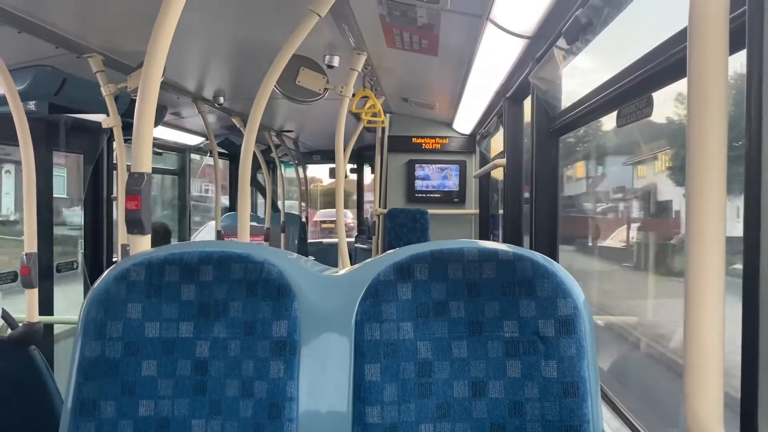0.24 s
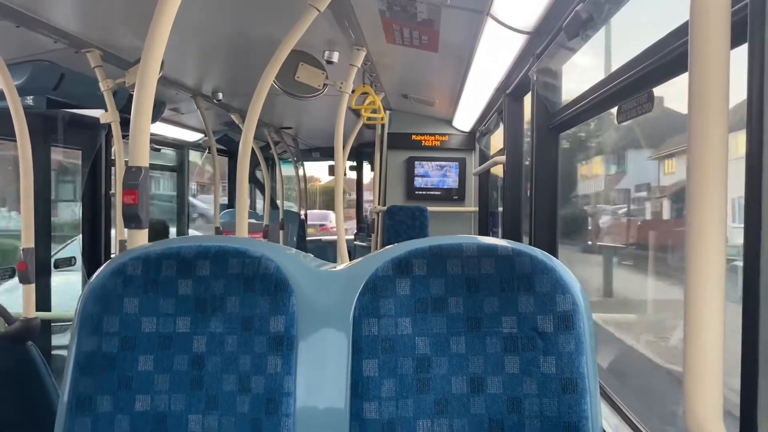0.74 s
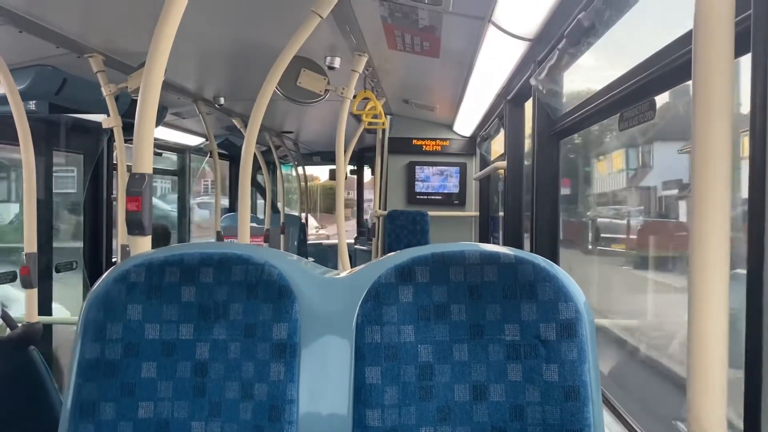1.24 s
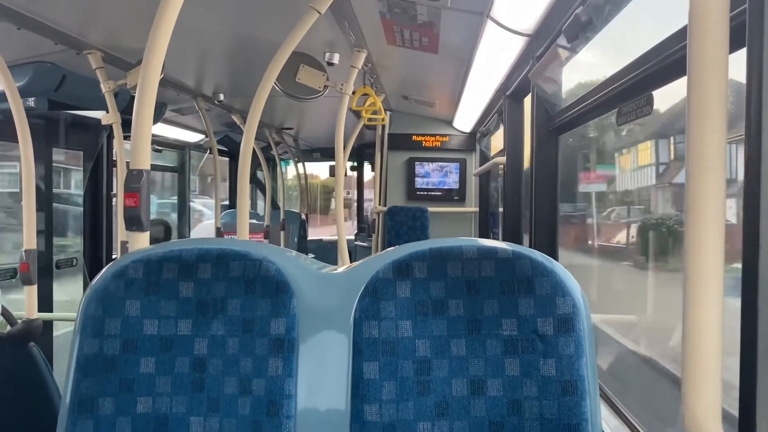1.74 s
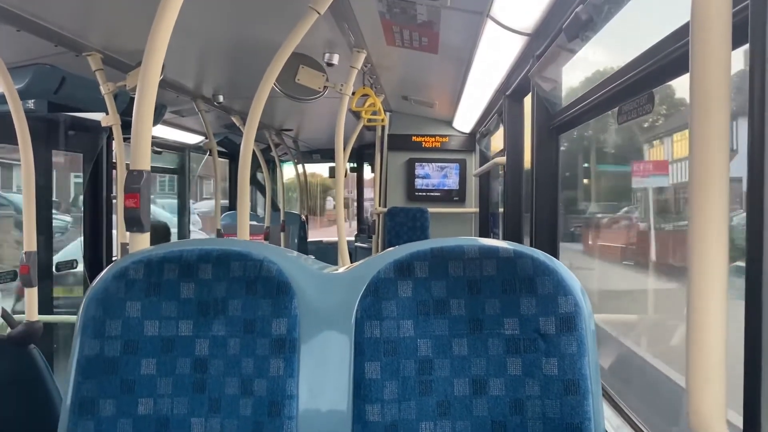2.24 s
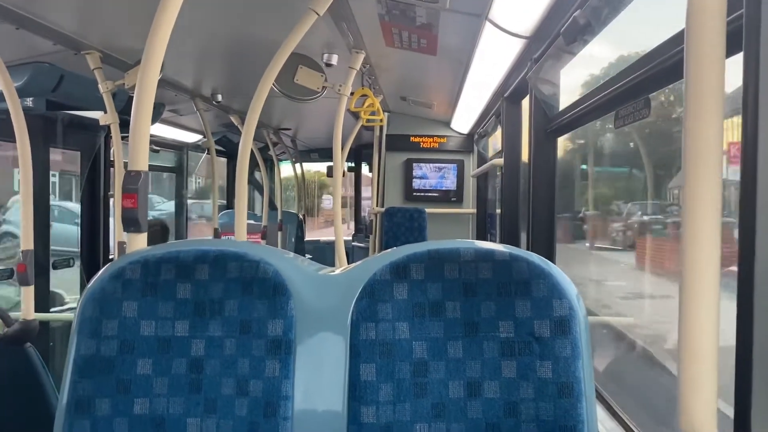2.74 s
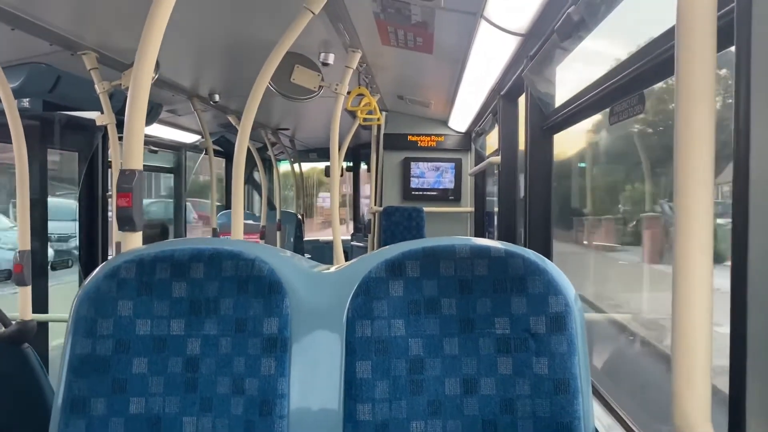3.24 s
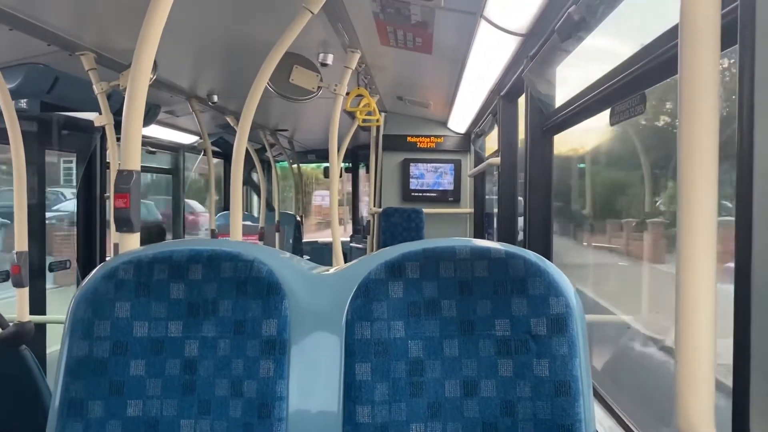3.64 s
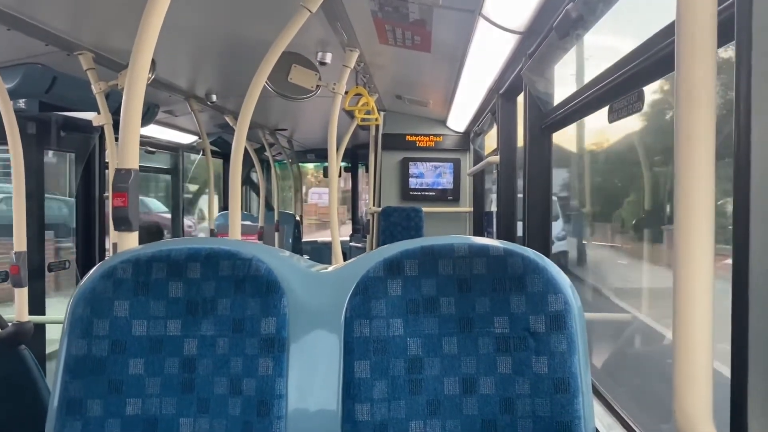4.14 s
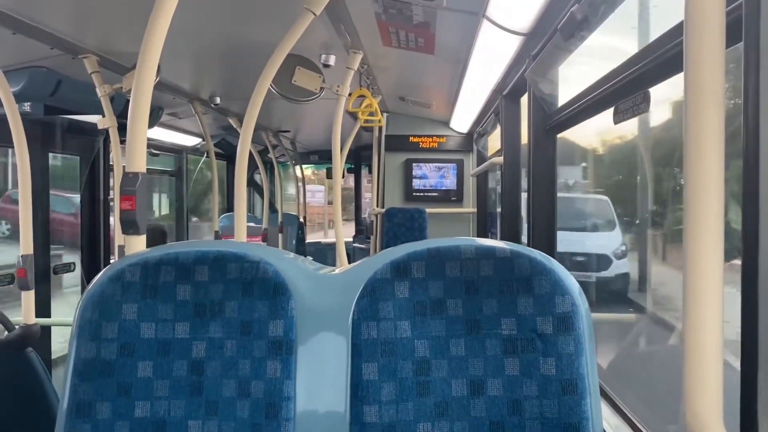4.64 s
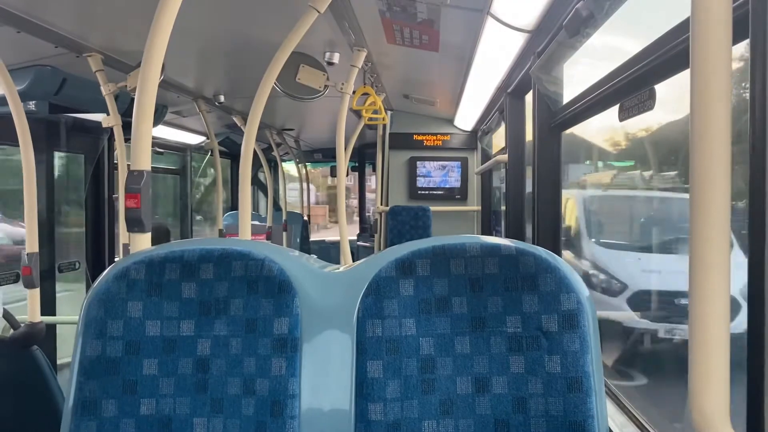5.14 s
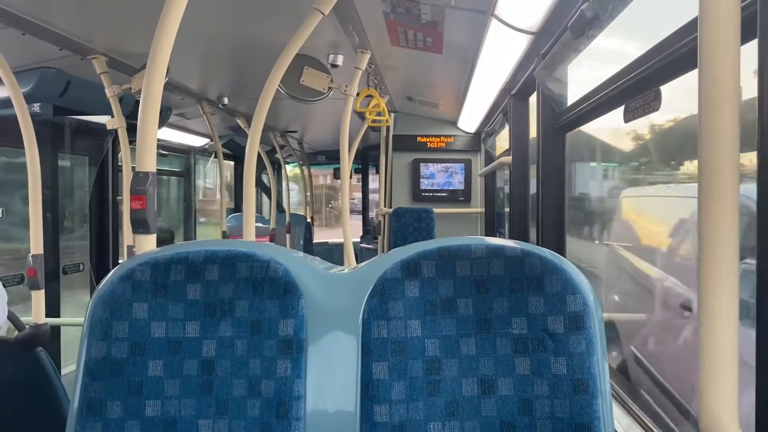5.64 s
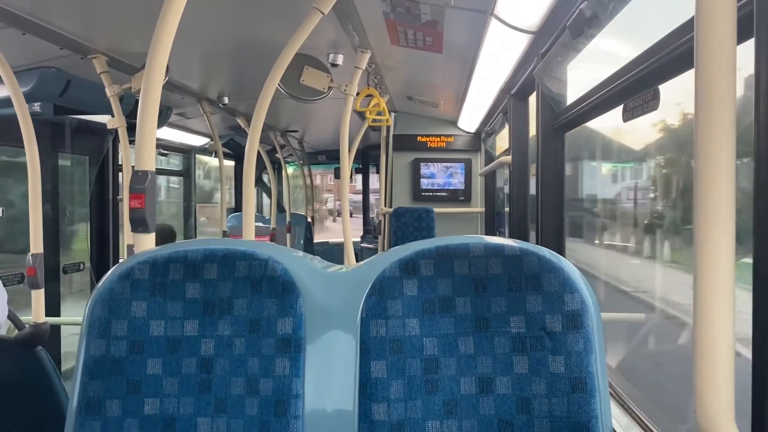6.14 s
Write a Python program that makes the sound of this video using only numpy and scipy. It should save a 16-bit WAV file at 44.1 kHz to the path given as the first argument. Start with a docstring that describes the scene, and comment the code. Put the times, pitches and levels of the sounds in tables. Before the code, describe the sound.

Steady low bus engine rumble with faint gear whine, muffled tyre roar, early bumps and buzzing window, a few light clicks, sinking slightly near the end.

```python
"""A six-cylinder diesel drones at about 1200 rpm inside a moving city bus, slowly falls, and coasts near the end.
Its drone is a stack of tones locked to the engine cycle; gears, an accessory and a turbo add hum, whine and whistle.
Coloured noise makes the suspension thud, the floor drum and the tyres roar, all swelling on rough patches of road.
Panels chatter in clumps of taps, a window pane buzzes on its resonances, panels ring, and loose fittings click
and tick in the cabin."""
import sys
import numpy as np
from scipy import signal
from scipy.fft import rfft, irfft, next_fast_len
from scipy.io import wavfile
from scipy.ndimage import uniform_filter1d, minimum_filter1d, map_coordinates

SR = 44100
rng = np.random.default_rng(int(sys.argv[2]) if len(sys.argv) > 2 else 0)


def master_out(mix):
    """Clip the mix to full scale and print it as 16-bit PCM to the path in sys.argv[1]."""
    frames = np.transpose(np.atleast_2d(mix))
    ceiling = np.clip(frames, -1, 1)
    pcm = np.round(ceiling * 32767).astype(np.int16)
    wavfile.write(sys.argv[1], SR, pcm)


N = 281653
TOP_HZ = 15800  # upper band limit


def amp(db):
    """Decibels to gain."""
    return 10 ** (np.asarray(db) / 20)


def unit(x):
    """Scaled to rms 1."""
    return x / np.sqrt(np.mean(x ** 2) + 1e-20)


def along(points, hz):
    """Reads (hz, value) points on a log frequency axis."""
    point_hz, values = np.transpose(points)
    return np.interp(np.log(hz + 1), np.log(point_hz + 1), values)


def curves(rows):
    """One value per sample for each column after the time."""
    s, *columns = np.transpose(rows)
    return [np.interp(np.arange(N) / SR, s, column) for column in columns]


def wobble(rate):
    """A smooth random curve, rate knots a second."""
    knots = rng.standard_normal(int(N * rate / SR) + 4)
    coarse = np.arange(0, N + 32, 32)
    smooth = map_coordinates(knots, [coarse * rate / SR], mode="nearest")
    return np.interp(np.arange(N), coarse, smooth)


def filtered(x, response):
    """x times a complex response of frequency."""
    m = next_fast_len(N + SR // 2)
    return irfft(rfft(x, m) * response(np.fft.rfftfreq(m, 1 / SR)), m)[..., :N]


def resonance(hz, centre, width):
    """Response of one damped mode."""
    return 1j * hz * width / (centre ** 2 - hz ** 2 + 1j * hz * width)


# Stereo width of the noises: pitch_hz, likeness of left and right (1 same, 0 unrelated, -1 opposite)
STEREO_LIKENESS = [(60, 0.99), (130, 0.97), (240, 0.78), (400, 0.19), (640, 0.39), (1400, -0.26),
                   (3000, 0.38), (7000, 0.043), (15000, 0.22)]


def spread(pair, spectrum):
    """Two unrelated signals become a coloured stereo field: bass alike in both ears, treble diffuse."""
    def mid_side(hz):
        turn = np.arccos(np.clip(along(STEREO_LIKENESS, hz), -1, 1)) / 2
        return amp(along(spectrum, hz)) * [np.cos(turn), np.sin(turn)]
    mid, side = filtered(pair, mid_side)
    return unit(np.array([mid + side, mid - side]))


def rush(spectrum):
    """Stereo noise of rms 1 in the given colour."""
    return spread(rng.standard_normal((2, N)), spectrum)


# Engine tones: order (multiple of the cycle rate), coasting_db, easing_db, pulling_db
ENGINE_TONES = [(5, -48.5, -41.5, -28), (6, -28, -15.5, -18.5), (7, -35.5, -41.5, -36.5),
                (8, -38, -29, -23), (9, -36, -22.5, -19.5), (10, -37.5, -33.5, -32),
                (11, -32, -44.5, -20.5), (12, -38.5, -31.5, -42), (13, -31, -39, -45),
                (14, -44.5, -48, -46), (15, -31.5, -37, -43), (16, -51, -46.5, -37),
                (18, -50, -42.5, -43.5), (19, -43.5, -45, -46), (20, -54, -43, -43),
                (22, -45.5, -41.5, -47), (23, -47.5, -47, -48), (24, -31.5, -31, -29.5),
                (27, -55, -51.5, -41.5), (32, -67, -48, -51.5), (33, -74, -60.5, -51.5),
                (40, -68.5, -49, -47.5), (44, -84, -64.5, -53), (50, -70.5, -49, -59.5)]


def engine(crank, waver_db=0.87, boom_waver_db=1.06):
    """Six firings a cycle make the boom; unequal cylinders add the other multiples. Each tone has its own phase
    offset, growing with the root of its order, so the throb evens into a fluttering drone."""
    firing_hz, phase_spread_s = 60, .516
    easing_share, pulling_share = load()
    out = np.zeros(N)
    for order, coasting_db, easing_db, pulling_db in ENGINE_TONES:
        db = coasting_db + (easing_db - coasting_db) * easing_share
        db = db + (pulling_db - easing_db) * pulling_share
        offset = 2 * np.pi * firing_hz * phase_spread_s * (np.sqrt(order / 6) - 1)
        if order == 6:  # the firing boom
            db = db + boom_waver_db * wobble(5.5)
        else:  # the path wavers as the body flexes
            db = db + waver_db * wobble(5)
            offset = offset + .07 * wobble(5)
        out += amp(db) * np.sqrt(2) * np.cos(order * crank - offset)
    return out


# Driver's foot: time_s, throttle (1 pulling, 0.5 easing, 0 coasting)
THROTTLE_MOVES = [(0, 0.82), (1.4, 0.92), (2.8, 0.79), (3.3, 0.48), (5.17, 0.43), (5.58, 0.017),
                  (5.85, 0.016), (6.03, 0.42), (6.39, 0.08)]


def load():
    """Shares 0-1: how far the throttle is open from coasting to easing, and from easing to pulling."""
    throttle = np.clip(curves(THROTTLE_MOVES)[0], 0, 1)
    return np.minimum(2 * throttle, 1), np.maximum(2 * throttle - 1, 0)


# Accessory hum, before its lean to the left: time_s, level_db
HUM_LEVEL = [(0, -38.5), (.25, -37), (.7, -40), (1.5, -39.5), (2, -42.5), (2.6, -58), (3.3, -49.5),
             (4, -44), (4.65, -39.5), (5.2, -37.5), (5.8, -48), (6.3, -48)]


def hum(crank, lean_db=2.0):
    """An accessory driven by the engine hums on one clear note that swells and fades."""
    db = curves(HUM_LEVEL)[0] + lean_db * np.array([[.5], [-.5]])
    return shaft_tone(crank, 48, db, flutter_db=0.4, lead=0.61, drift=0.09)


# Gear whine, on twice the mesh rate, before the final trim: time_s, left_db, right_db
WHINE_LEVEL = [(0, -59, -55), (.95, -56, -56), (1.2, -50, -46.5), (1.55, -56, -58), (1.7, -50, -45),
               (1.95, -55, -44.5), (2.15, -46, -48), (2.45, -49, -59), (2.85, -48, -56), (3.06, -55, -56),
               (3.17, -43.5, -46), (3.32, -47, -54), (3.5, -44, -52), (3.82, -43.5, -45.5),
               (3.96, -57, -55), (4.1, -49, -59), (4.22, -56, -60), (4.38, -46, -58), (5.2, -47, -51.5),
               (5.33, -62, -61), (5.5, -56, -56), (5.6, -48, -46), (5.8, -47.5, -47), (5.89, -58, -62),
               (5.98, -47, -44.5), (6.07, -60, -53), (6.22, -44, -41), (6.3, -52, -52), (6.39, -49, -52)]
# Weaker gear tones, loudest when the wheels drive the engine, before the final trim:
# time_s, first_db (at the mesh rate), third_db (at three times that)
SIDE_GEAR_TONES = [(0, -58, -74.5), (5.58, -59, -73), (5.69, -37.5, -57), (5.8, -41.5, -71),
                   (5.95, -44, -58), (6.03, -54, -58), (6.17, -54, -58), (6.28, -55, -60), (6.37, -37, -61)]


def whine(crank, flutter_db=2.0, trim_db=-1):
    """The gear mesh sings, a little hoarse, surging on its second multiple; coasting brings up first and third."""
    mesh_order = 68  # mesh rate as a multiple of the cycle rate
    first_db, third_db = curves(SIDE_GEAR_TONES)
    levels = [first_db, np.array(curves(WHINE_LEVEL)), third_db]
    backlash = .0026 * wobble(75)  # radians of the cycle, shared by the three tones
    tones = [shaft_tone(crank + backlash, k * mesh_order, db, flutter_db, lead=.9, drift=.42)
             for k, db in enumerate(levels, 1)]
    return amp(trim_db) * sum(tones)


def shaft_tone(crank, order, db, flutter_db, lead, drift):
    """A tone tied to the crank flutters as it reaches each ear by many shifting paths; db is mono or per ear."""
    shaft = order * crank + rng.uniform(0, 2 * np.pi) + drift * wobble(30)
    db = db + flutter_db * (wobble(16) + np.array([wobble(11), wobble(11)]))
    ears = [np.cos(shaft + sign * lead / 2 + drift * wobble(5.6)) for sign in (1, -1)]
    return amp(db) * np.sqrt(2) * np.array(ears)


def turbo():
    """A thin, airy whistle sinks as the turbine runs down off the throttle, and flares past a pipe resonance."""
    whistle_hz, lift_s, run_down_hz_per_s = 5760, 5.3, 1400  # pitch under load, throttle closing, fall after it
    whistle_db, intake_db = -82.5, -66.5
    intake_hz, intake_width_hz = 5000, 120
    hz = whistle_hz - run_down_hz_per_s * np.maximum(np.arange(N) / SR - lift_s, 0)
    flare = np.abs(resonance(hz, intake_hz, intake_width_hz)) ** 2
    gain = amp(whistle_db) + amp(intake_db) * flare
    unsteady_hz = 45 * wobble(150)
    flutter_db = 3 * np.array([wobble(20), wobble(20)])
    return gain * amp(flutter_db) * np.sin(2 * np.pi * np.cumsum(hz + unsteady_hz) / SR)


# Colour of the suspension thud: pitch_hz, density_db (per Hz, relative)
THUD_COLOUR = [(10, -13), (20, -6), (33, 17.5), (45, 6.5), (62, 7), (90, 4), (140, -34.5), (300, -68)]
# Colour of the floor drumming: pitch_hz, density_db (per Hz, relative)
FLOOR_COLOUR = [(25, -31), (52, 3), (70, 2.5), (88, 3), (112, 3.5), (140, -0.5), (190, -6), (222, -2.5),
                (250, -7.5), (285, -12.5), (335, -11), (420, -21.5), (700, -48.5), (2000, -79)]
# Colour of the tyre roar: pitch_hz, density_db (per Hz, relative)
TYRE_COLOUR = [(150, -20), (370, 1), (480, 2.5), (560, -0.5), (650, 1), (800, -5.5), (1080, -8),
               (1230, -10), (1380, -9), (1620, -18), (1950, -17.5), (2800, -25), (4200, -33), (8000, -48),
               (16000, -44)]
# Answer to the road: smooth_db (at cruising speed), speed_db (per engine cycle a second), bump_db
THUD_DRIVE, FLOOR_DRIVE, TYRE_DRIVE = (-29.5, 3.6, -17), (-23, 2, -17), (-34.5, 2.6, -32)


def road(speed, jolt, shake, uneven_db=0.42, tread_db=0.81):
    """The road heaves the suspension, drums on the floor and roars under the tyres."""
    thud = road_gain(THUD_DRIVE, speed, jolt) * rush(THUD_COLOUR)
    floor = road_gain(FLOOR_DRIVE, speed, jolt) * rush(FLOOR_COLOUR)
    tyres = road_gain(TYRE_DRIVE, speed, shake) * amp(tread_db * wobble(18)) * rush(TYRE_COLOUR)
    return amp(uneven_db * wobble(8.1)) * (thud + floor + tyres)


def road_gain(drive, speed, bump):
    """A steady part that grows with speed, plus the part that the bumps excite."""
    smooth_db, speed_db, bump_db = drive
    cruise_speed = 10  # engine cycles a second
    return np.hypot(amp(smooth_db + speed_db * (speed - cruise_speed)), amp(bump_db) * bump)


# Rough patches of road: start_s, length_s, jolt_db (suspension, relative), shake_db (body, relative)
ROUGH_PATCHES = [(.01, 0.1, -0.5, 0.5), (0.317, .03, -4.5, -22.5), (0.54, 0.059, 0.5, 0.5),
                 (.69, .07, -10, -7), (0.873, 0.03, -0.5, -7.5), (1.412, 0.052, -10, -13.5),
                 (2.195, 0.026, -10.5, -5), (2.459, 0.04, -13.5, -9), (2.715, 0.039, -4, -4),
                 (2.846, 0.064, -4.5, -2.5), (5.346, 0.034, -12, -26)]


def bumps():
    """Jolt and shaking over time: each rough patch rises, holds while the wheels cross it and dies away."""
    jolt_rise, jolt_fall, shake_rise, shake_fall = 130, 61, 79, 53.5  # dB per second
    shake_lag_s = 0.06  # the body answers late and settles slowly
    t, jolt, shake = np.arange(N) / SR, 0, 0

    def swell_db(age, length, rise, fall):
        return rise * np.minimum(age, 0) - fall * np.maximum(age - length, 0)
    for s, length, jolt_db, shake_db in ROUGH_PATCHES:
        jolt_swell = swell_db(t - s, length, jolt_rise, jolt_fall)
        shake_swell = swell_db(t - s - shake_lag_s, length, shake_rise, shake_fall)
        jolt = np.hypot(jolt, amp(jolt_db + jolt_swell))
        shake = np.hypot(shake, amp(shake_db + shake_swell))
    return jolt, shake


# Colour of the panel chatter: pitch_hz, density_db (per Hz, relative)
PANEL_COLOUR = [(400, -22.5), (1000, 0.5), (1800, 5.5), (2700, 0), (4000, -7), (5500, -10), (7500, -22),
                (11000, -22), (15500, -39)]
PANEL_DRIVE = (-54.5, 2, -41.5)  # smooth_db, speed_db (per engine cycle a second), bump_db


def rattle(speed, shake, taps_per_s=700, size_db=-0.5, tap_gain_db=-1, hiss_gain_db=-2):
    """Panels and panes chatter in clumps of tiny taps that blur into a hiss in the cabin."""
    hit = rng.random((2, N)) < taps_per_s / SR
    size = amp(size_db * np.minimum(rng.exponential(size=(2, N)), np.pi))
    taps = hit * np.sign(rng.standard_normal((2, N))) * size
    clumps_db = 2.4 * np.array([wobble(40), wobble(40)])
    jolts_db = 1.1 * wobble(20)
    chatter = amp(tap_gain_db + clumps_db) * spread(taps, PANEL_COLOUR)
    hiss = amp(hiss_gain_db) * rush(PANEL_COLOUR)
    return road_gain(PANEL_DRIVE, speed, shake) * amp(jolts_db) * (chatter + hiss)


# Notes of the trim panels: pitch_hz, width_hz, gain_db
PANEL_NOTES = [(1780, 29, -5), (2695, 62, 4), (2930, 80, 1.5), (3470, 32, 6.5), (7100, 1300, 8)]


def panelled(x):
    """The trim panels strengthen some notes and weaken one in any noise that passes through them."""
    def note_gain(hz):
        return amp(sum(db * np.abs(resonance(hz, centre, width)) ** 2 for centre, width, db in PANEL_NOTES))
    return filtered(x, note_gain)


# Window buzzes: start_s, length_s, level_db (before the bounce)
PANE_BUZZES = [(0.058, 0.21, -42), (0.621, 0.1, -40), (2.888, 0.072, -41.5)]
# Resonances of the window pane: pitch_hz, width_hz, level_db (relative)
PANE_NOTES = [(1030, 310, -6.5), (1450, 350, -1), (1930, 350, -3)]


def buzz(flutter_db=3.0):
    """On the hardest bumps a window pane bounces in its frame and roars on its resonances."""
    rise_s, fall_s, bounce_hz = 0.02, 0.016, 52.6
    t, gain = np.arange(N) / SR, np.zeros(N)
    for s, length, db in PANE_BUZZES:
        rise = np.minimum(t - s, 0) / rise_s
        fall = np.maximum(t - s - length, 0) / fall_s
        gain += amp(db) * np.exp(rise - fall)
    bounces = amp(flutter_db * np.cos(2 * np.pi * bounce_hz * t + 2 * wobble(25)))

    def glass(hz):
        return sum(amp(db) * np.abs(resonance(hz, centre, width)) ** 2 for centre, width, db in PANE_NOTES)
    return gain * unit(filtered(bounces * rng.standard_normal((2, N)), glass))


# Panels that ring briefly as the body twists: start_s, pitch_hz, width_hz, level_db (before swell and decay), t60_s
PANEL_RINGS = [(.625, 4100, 250, -44, 0.21), (.925, 2566, 320, -36.5, 0.14), (1.395, 650, 15, -26.5, 0.21),
               (2.77, 298.6, 20, -19.5, 0.22), (5.53, 214.6, 6, -27, .5)]


def rings(rise_s=0.023):
    """A shaken panel rubs, swells into one rough note and dies away."""
    out = np.zeros((2, N))
    for s, hz, width_hz, db, t60 in PANEL_RINGS:
        t = np.maximum(np.arange(N) / SR - s, 0)
        roughness = 1.3 * np.array([wobble(2 * width_hz), wobble(2 * width_hz)])
        phase = 2 * np.pi * hz * t + roughness
        out += amp(db - 60 * t / t60) * (1 - np.exp(-t / rise_s)) * 2 * np.sin(phase)
    return out


# Loose fittings: start_s, level_db (of the onset, before the trim in clicks), top_db (treble tilt, reached at TOP_HZ),
# chatter_t60_s, knock_db (mount), ring_db (bracket), rebound_db
FITTING_CLICKS = [(.019, -43.5, -5, 0.027, -20, -17.5, -7.5), (.489, -34, -9, 0.011, -17, -14.5, -15),
                  (0.628, -45, 8.5, .012, -20, -20, -19), (1.193, -40, -5.5, 0.074, -7, -4, -4),
                  (1.996, -52, 10, .012, -22, -18, -19), (2.089, -52, 6.5, .012, -18, -20, -27),
                  (2.140, -48, -3.5, 0.018, -26, -19, -12), (2.261, -53, -2, 0.1, -21, -17, -4.5),
                  (4.158, -28, -2.5, 0.008, -6, -2, -12.5), (4.56, -34.5, -0.5, 0.06, 5.5, -16.5, -2.5),
                  (5.071, -44, -1.5, 0.029, -20, -11.5, -5), (5.352, -39, -8, 0.037, 2.5, 2.5, -6)]
# Colour of a fitting: pitch_hz, density_db (per Hz, relative)
FITTING_COLOUR = [(1200, -22.5), (2700, -12), (3850, -2), (5000, -9), (7000, -4.5), (10000, -15),
                  (12000, -8.5), (15500, -21)]
# Notes of the bracket: pitch_hz, width_hz, level_db (relative)
BRACKET_NOTES = [(2770, 260, -1), (3305, 200, -3), (4030, 380, 2.5), (4716, 220, -3)]


def clicks(echo_db=1.0, trim_db=-7.5):
    """A fitting snaps against its mount, rebounds, rings its bracket and echoes down the cabin."""
    mount_hz, mount_width_hz, rebound_s = 1700, 1700, 0.006
    out, t = np.zeros((2, N + SR)), np.arange(SR // 4) / SR
    f = np.fft.rfftfreq(len(t), 1 / SR)
    lead_in = SR // 500
    bracket = sum(amp(db) * resonance(f, hz, width) for hz, width, db in BRACKET_NOTES)
    mount = np.abs(resonance(f, mount_hz, mount_width_hz)) ** 2

    def strike(age, t60):
        return (age >= 0) * amp(-60 * np.abs(age) / max(t60, .002))
    for s, db, top_db, chatter_t60, knock_db, ring_db, rebound_db in FITTING_CLICKS:
        noise = rng.standard_normal((3, len(t)))
        rebound = amp(rebound_db) * strike(t - rebound_s, chatter_t60)
        envelope = np.hypot(strike(t, chatter_t60), rebound)
        chatter = (noise[0] + 0.59 * noise[1:]) * envelope  # partly shared by both ears
        contact = chatter / np.linalg.norm(chatter[0]) + amp(echo_db) * cabin_tail()[:, :len(t)]
        contact[:, 0] += .35  # the first snap
        colour = amp(along(FITTING_COLOUR, f) + top_db * f / TOP_HZ)
        body = np.hypot(colour, amp(knock_db) * mount) + amp(ring_db) * bracket
        click = irfft(rfft(np.roll(contact, lead_in, axis=1)) * body, len(t))
        click /= np.sqrt(np.mean(click[:, :SR // 150] ** 2))  # onset to rms 1
        out[:, round(s * SR) - lead_in:][:, :len(t)] += amp(db + trim_db) * click
    return out[:, :N]


# Decay of the cabin echo: pitch_hz, t60_s
CABIN_DECAY = [(300, 0.14), (3000, 0.15), (8000, 0.23), (15000, 0.024)]


def cabin_tail():
    """A diffuse stereo echo of the cabin, left energy 1; the top treble dies first."""
    hz, t, z = signal.stft(rng.standard_normal((2, SR // 3)), SR, nperseg=256)
    decay = amp(-60 * t / along(CABIN_DECAY, hz)[:, None])
    tail = signal.istft(z * decay, SR, nperseg=256)[1]
    return tail / np.linalg.norm(tail[0])


def small_rattles(per_s=9, level_db=-63, spread_db=2.5, t60=0.037):
    """Trim and handrails tick faintly at random all the time, each tick a short burst of noise."""
    size = amp(spread_db * np.minimum(rng.exponential(size=N), np.e))
    hits = (rng.random(N) < per_s / SR) * size
    decay = amp(-60 * np.arange(SR // 10) / SR / max(t60, .005))
    return amp(level_db) * signal.fftconvolve(hits, decay)[:N] * rush(FITTING_COLOUR)


# Engine speed: time_s, rate_hz (engine cycles a second; one cycle = two turns, six firings)
ENGINE_SPEED = [(0, 10.07), (.55, 10.07), (1, 10), (1.5, 10), (1.8, 9.95), (2.25, 9.81), (2.75, 9.81),
                (3.2, 9.7), (3.8, 9.68), (4.2, 9.61), (4.65, 9.63), (5.15, 9.61), (6.1, 9.17), (6.39, 9.0)]
# Balance of the seat: pitch_hz, left_minus_right_db
SEAT_BALANCE = [(60, 0.5), (110, -2), (200, -1.5), (270, -4), (380, 4), (700, 2.5), (1300, 0), (2400, 0.5)]


def scene():
    """Everything heard from one seat; standing waves in the cabin favour one ear or the other."""
    speed, = curves(ENGINE_SPEED)
    crank = 2 * np.pi * np.cumsum(speed) / SR  # phase of the engine cycle, radians
    jolt, shake = bumps()
    drive = engine(crank) + hum(crank) + whine(crank) + turbo()
    body = panelled(road(speed, jolt, shake) + rattle(speed, shake))
    body = body + buzz() + rings() + clicks() + small_rattles()
    return filtered(drive + body, lambda hz: amp(np.outer([.5, -.5], along(SEAT_BALANCE, hz))))


def record(dry):
    """A limiter dips both ears briefly around the highest peaks; nothing above the band limit passes."""
    needed = np.minimum(1, .91 / (np.abs(dry).max(axis=0) + 1e-9))
    held = minimum_filter1d(needed, size=SR // 40)
    gain = uniform_filter1d(held, size=SR // 40)
    return filtered(dry * gain, lambda hz: hz < TOP_HZ)


dry = scene()
out = record(dry)
master_out(out)
```